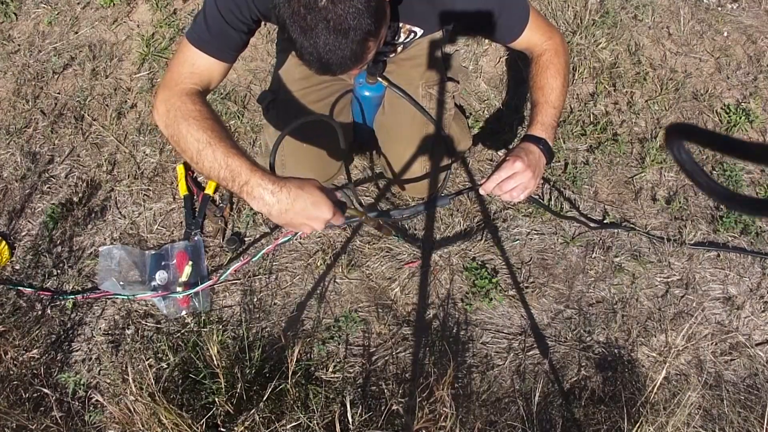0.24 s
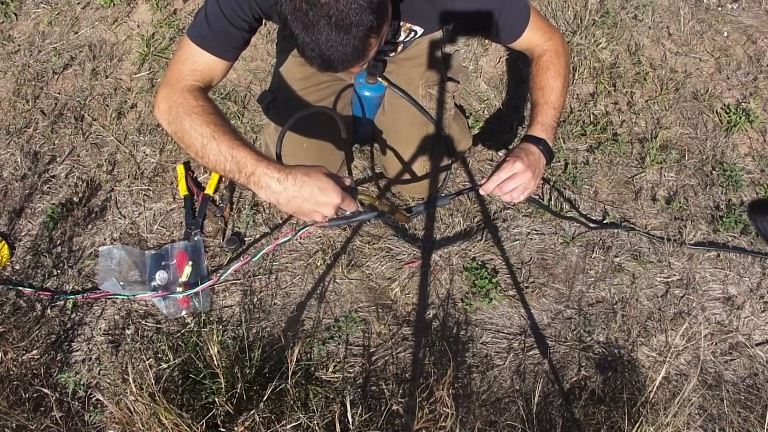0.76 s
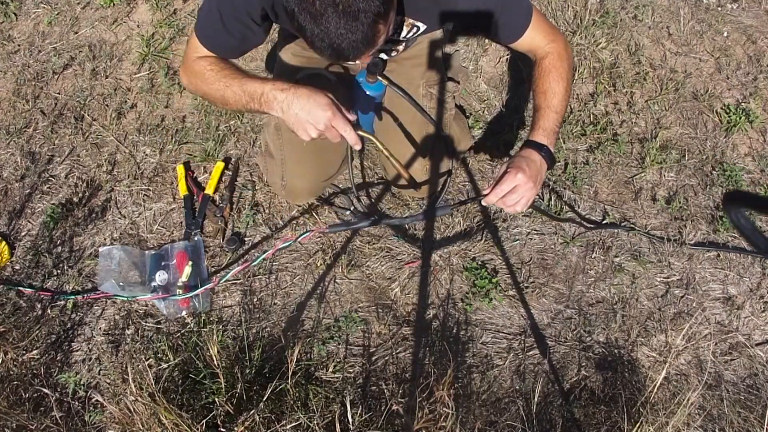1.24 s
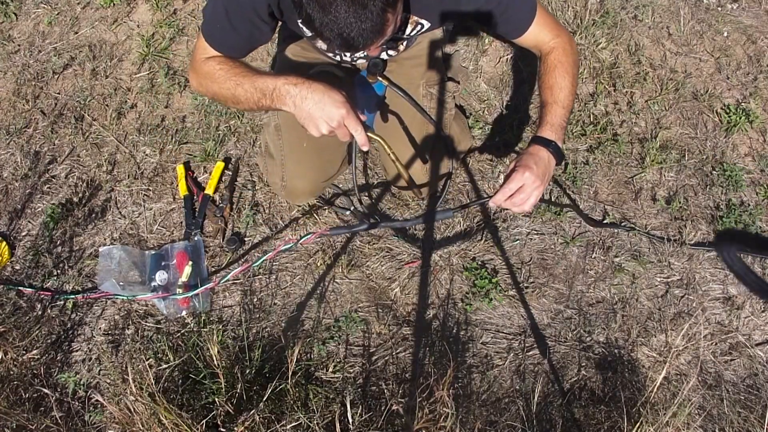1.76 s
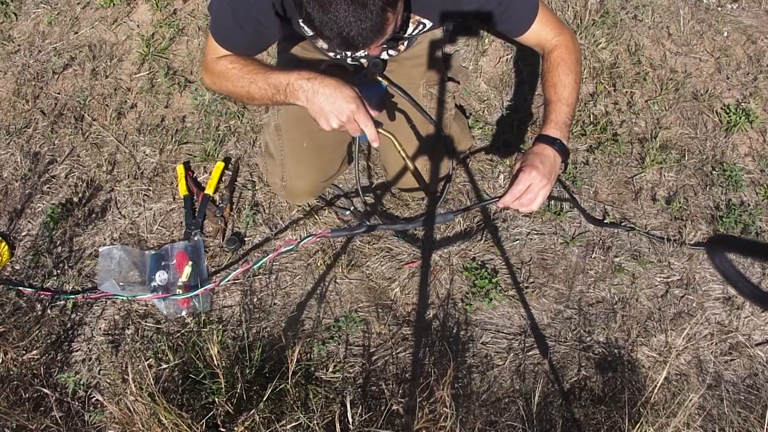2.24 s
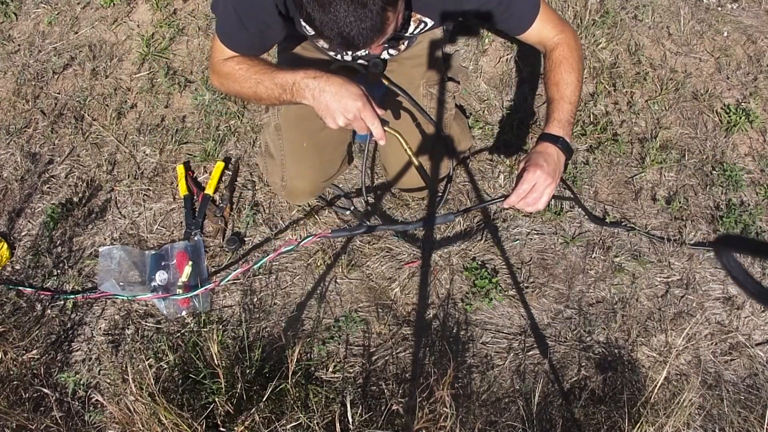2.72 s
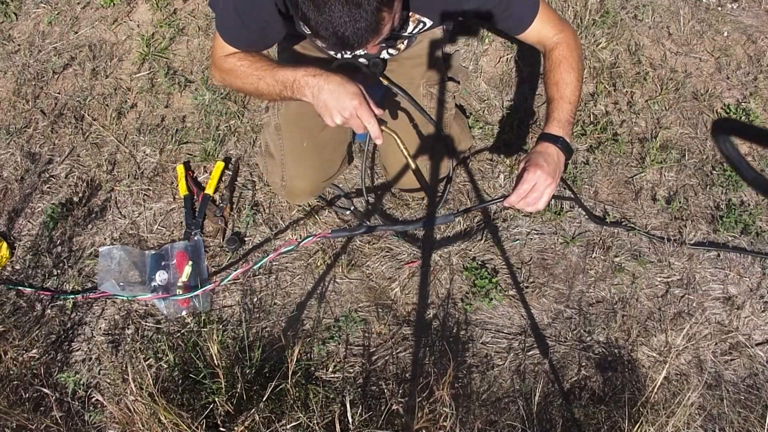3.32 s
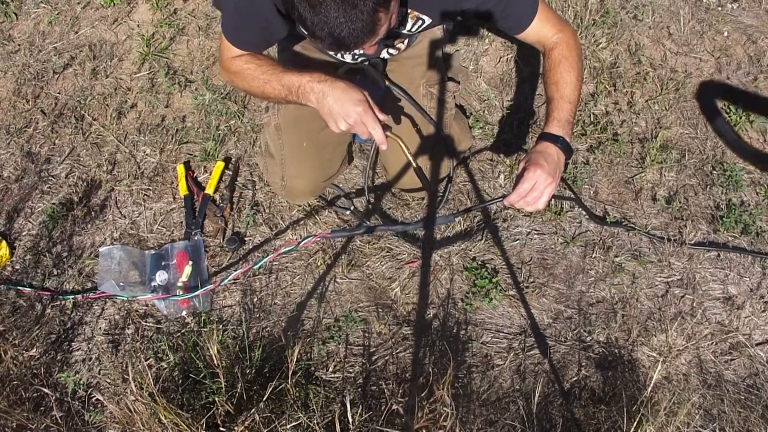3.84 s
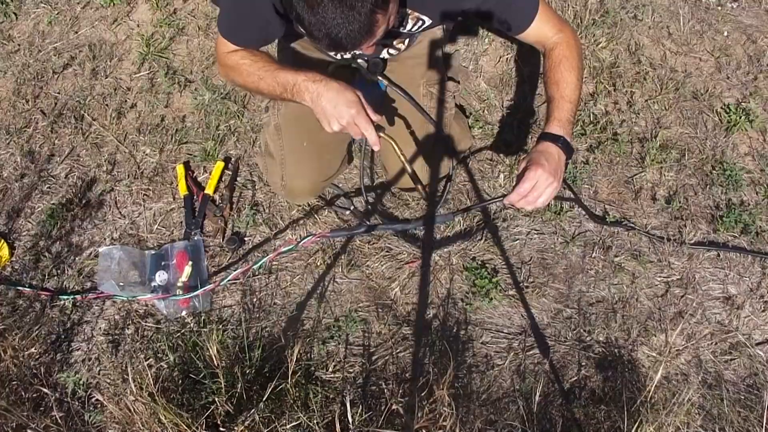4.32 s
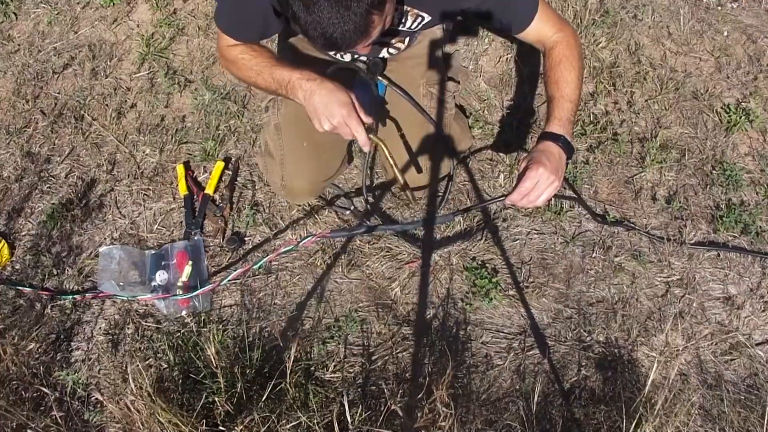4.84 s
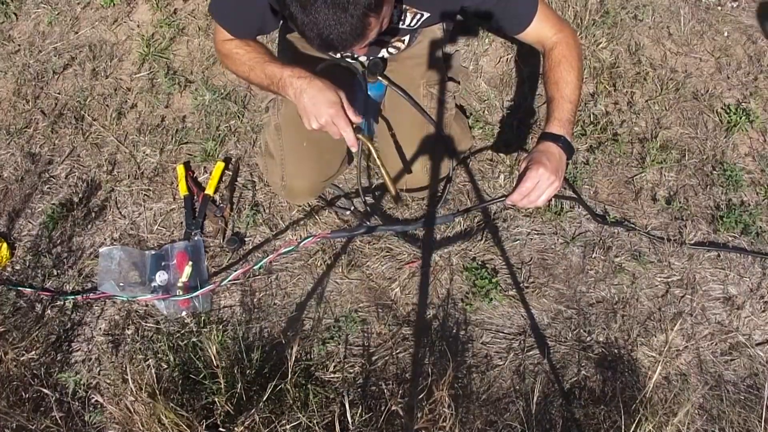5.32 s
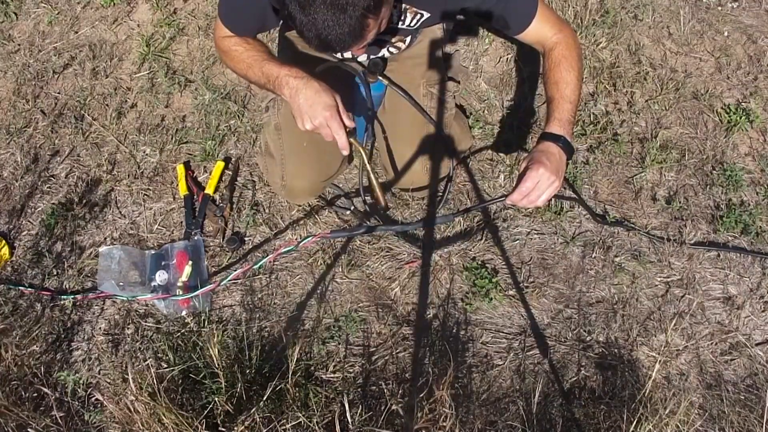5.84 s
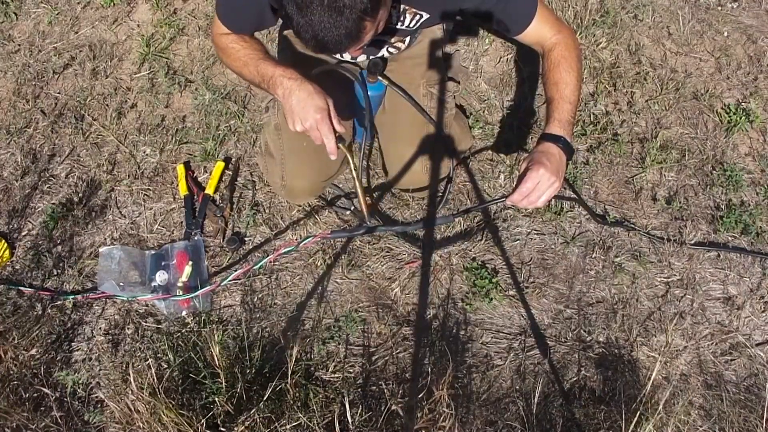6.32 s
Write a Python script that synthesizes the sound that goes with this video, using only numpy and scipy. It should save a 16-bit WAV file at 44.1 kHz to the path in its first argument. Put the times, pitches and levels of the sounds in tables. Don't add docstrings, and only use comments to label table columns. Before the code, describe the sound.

From 0 s a handheld gas torch is already burning close to dry, grassy ground: a continuous, breathy, mid-pitched roar with rapid flutter and a weaker high hiss from the nozzle. Its colour sweeps gently, a hollow phasing caused by ground echoes as the hand sways. Small flares and faint pops appear around 1.6 and 2.6 s. Light low wind puffs brush the microphone near the start and at 2.3-2.9 s, with very faint, high cricket trills far behind. Wind swells from about 3.4 s, and just after 4 s a violent gust strikes, with blunt thumps jumping between left and right. Until 6.6 s irregular low slaps and rumble keep buffeting the microphone, strongest around 4.1, 4.5, 5.0-5.2, 5.8 and 6 s, some with dull overload ticks. The loudness ducks briefly after big hits, while the torch roars on beneath, without stopping.

```python
import sys
import numpy as np
from scipy import signal
from scipy.fft import rfft, irfft, next_fast_len
from scipy.io import wavfile
from scipy.ndimage import uniform_filter1d, map_coordinates

SR = 44100
rng = np.random.default_rng(int(sys.argv[2]) if len(sys.argv) > 2 else 0)


def linear_from_db(decibels):
    return 10 ** (np.asarray(decibels, float) / 20)


def file_out(sig):
    cols = np.atleast_2d(sig).T
    lim = np.clip(cols, -1, 1)
    pcm = np.round(lim * 32767).astype(np.int16)
    wavfile.write(sys.argv[1], SR, pcm)


N = 290178

# time_s, roar_db, hiss_above_roar_db
TORCH_LEVELS = [(0, -29, -18.5), (.9, -29, -19), (1.35, -27.8, -18), (2.05, -30.5, -16.5),
                (2.9, -29, -17.5), (3.55, -29, -16.5), (4.0, -30.5, -17.5), (4.36, -37.5, -16.5),
                (4.75, -30, -18), (5.1, -30, -17.5), (5.3, -32, -19), (5.55, -29, -18),
                (5.95, -28.5, -16.5), (6.2, -33.5, -18.5), (6.36, -31, -19.5), (6.46, -28, -22.5),
                (6.58, -27, -17)]
# time_s, change_db
FLARES = [(.76, 1), (1.64, 1), (2.63, 2.5), (2.88, 1), (3.25, 2.5), (4.09, 5.5), (4.53, 4), (4.72, 2),
          (4.9, 1.5), (5.51, 0.5), (5.88, -1), (6.24, 3.5)]
# time_s, peak_db
POPS = [(1.658, -17.5), (2.629, -16.5), (4.347, -19.5), (5.341, -16), (5.406, -20.5), (5.505, -17),
        (5.867, -20.5), (6.061, -14), (6.223, -16.5), (6.404, -18.5), (6.437, -16.5), (6.482, -17)]
# pitch_hz, level_db (per Hz)
ROAR_COLOUR = [(50, -36), (200, -13.5), (330, -19), (470, -6), (700, -3.5), (1000, -1.5), (1200, -4.5),
               (1400, -2.5), (1700, -5.5), (2300, -11.5), (2800, -17), (3400, -24.5), (5000, -30)]
# pitch_hz, level_db (per Hz)
HISS_COLOUR = [(2500, -2.5), (3400, 2.5), (4500, 3.5), (5600, 3), (7200, 5), (9000, 0), (10900, 0.5),
               (13100, -31), (14500, -16), (15800, -12.5)]
# near_end_s, strokes_done
HAND_STROKES = [(-.15, -1), (.13, 0), (.72, 2), (.97, 3), (1.9, 8), (2.47, 11), (2.92, 13), (3.32, 15),
                (3.79, 17), (4.2, 19), (5.97, 28), (6.68, 32)]
# time_s, mean_delay_ms, swing_per_stroke_ms
ECHO_DELAYS = [(0, 1.388, 0.13), (.7, 1.485, 0.081), (1.1, 1.6, 0.043), (1.5, 1.63, 0.036),
               (2.05, 1.53, .05), (2.5, 1.6, 0.043), (3.2, 1.56, 0.07), (3.7, 1.54, 0.11),
               (4.2, 1.45, 0.083), (4.8, 1.3, 0.086), (5.5, 1.324, 0.069), (6.0, 1.254, 0.048),
               (6.58, 1.22, .04)]
# time_s, first_bounce (0 to 1), second_bounce (0 to 1)
ECHO_STRENGTHS = [(0, .55, 0.25), (.5, 0.5, .3), (1, 0.57, 0.18), (1.4, 0.77, 0.49), (1.7, .45, 0.23),
                  (2.05, 0.2, 0.2), (2.4, 0.43, 0.45), (3, .5, 0.31), (3.6, 0.38, 0.36), (4, 0.26, 0.04),
                  (4.5, .45, 0.08), (5, 0.52, 0.05), (5.6, 0.38, 0.03), (6, 0.5, 0), (6.58, 0.56, 0.02)]
# pitch_hz, side_below_mid_db
TORCH_SPREAD = [(100, -11), (700, -27.5), (2400, -17), (4400, -14.5), (6500, -22.5), (7800, -9),
                (9000, -11), (11000, -12.5), (15000, -3)]
# time_s, level_db, left_minus_right_db
BREEZE = [(0, -37, -7), (.2, -45.5, 3), (.42, -44, -3), (.9, -55, 4), (1.7, -69, 3), (2.3, -59, 8),
          (2.55, -54, 12), (2.7, -39.5, -5), (2.95, -57, 8), (3.2, -48, -1), (3.45, -37, 9),
          (3.65, -36.5, 3), (3.74, -29, -1), (3.96, -33, 0), (4.04, -24, -2), (4.9, -28, 5),
          (5.55, -27, 0.5), (6.58, -28.5, -1.5)]
# pitch_hz, level_db (per Hz)
RUMBLE_COLOUR = [(12, -73), (20, -48), (75, -10), (123, -1), (211, 1), (327, -2), (480, -6.5), (826, -16.5),
                 (1300, -36), (1690, -42), (2860, -120)]
# time_s, peak_db,
# pitch_hz, push (+) or pull (-)
MORE_PUFFS = [
    [(.36, -22, 120, 1), (2.28, -31, 90, 0.85), (2.88, -23, 60, -1), (3.73, -12, 222, 1), (4.08, 0, 520, -1), (4.092, -8, 850, 1), (4.068, -10, 750, -1)],
    [(.12, -27, 120, -0.85), (.46, -23, 140, 1), (2.72, -24, 150, -1.1), (2.87, -25, 90, 1), (4.06, -15, 420, 0.92)],
]
# time_s, peak_db, pitch_hz, push (+) or pull (-)
LEFT_SLAPS = [(4.0198, -10, 288, -1.1), (4.098, -8, 384, 0.69), (4.1423, -9.5, 226, -0.63),
              (4.166, -10.5, 172, 0.93), (4.2508, -1.5, 183, 0.42), (4.2972, -9.5, 215, -1.2),
              (4.3264, -12, 213, -0.89), (4.3515, -9.5, 183, 1), (4.4755, -16, 193, -1),
              (4.6447, -9.5, 170, -1.6), (4.7276, -21, 215, 1), (4.7562, -4, 340, 1),
              (4.99, -12, 193, 0.78), (5.1305, -2.5, 312, -0.96), (5.1582, -4.5, 236, -0.79),
              (5.243, -16, 241, -1.6), (5.3235, -10, 223, -1.2), (5.3658, -7, 215, -1.2),
              (5.687, -6, 161, 0.72), (5.7732, -8, 204, -1), (5.8288, -2, 326, 1),
              (5.9417, -2.5, 404, 0.64), (6.0042, -5.5, 274, 1), (6.093, -8.5, 170, 0.51),
              (6.3642, -16, 226, 1), (6.5558, -6, 312, -0.62)]
# time_s, peak_db, pitch_hz, push (+) or pull (-)
RIGHT_SLAPS = [(4.047, -7, 322, 1), (4.0702, 1, 513, -0.94), (4.0872, -0.5, 330, -0.71),
               (4.1113, -18, 258, 0.88), (4.1987, -4, 338, 0.92), (4.3696, -13, 462, -1),
               (4.5141, -1.5, 345, 1), (4.558, -8.5, 396, -1.7), (4.717, -10, 266, -0.76),
               (4.7473, -3, 440, -1.6), (4.8792, -14, 215, -1), (4.9023, -10, 204, -0.9),
               (4.9594, -7.5, 260, -0.64), (5.0432, 0, 318, 0.86), (5.1146, -6, 193, 1),
               (5.15, -11, 290, -1), (5.1941, -3, 307, 1), (5.2178, -3.5, 249, 0.92),
               (5.4144, -10, 448, -1.5), (5.775, -7, 236, 0.78), (5.8145, 0, 455, -0.73),
               (5.9726, -2.5, 366, -0.46), (6.077, -9, 333, -0.98), (6.1727, -8.5, 301, -0.69),
               (6.1974, -5.5, 312, -0.91), (6.2669, -8, 293, -1.7), (6.3194, -5, 269, 1),
               (6.3588, -10, 236, -1.2), (6.5549, -2, 298, -0.56)]
# start_pitch_hz, rise_hz, trill_length_s, level_db
CRICKETS = [
    (7100, 100, 0.81, -61),
    (7950, 150, .3, -66),
    (8600, 170, 0.33, -66),
]
TRILL_STARTS = [
    [.35, 1.05, 1.7, 2.35, 3.05, 4.7, 5.4, 6.12],
    [.42, 1.12, 1.75, 2.42, 3.12, 3.68, 4.5, 5.15, 5.85],
    [.1, .9, 1.82, 2.65, 3.25, 3.6, 3.97, 4.85, 5.57, 6.4],
]
# pitch_hz, width_hz, change_db
BAND_CUTS = [
    (3002, 1200, -43),
    (3990, 1390, -36),
    (4940, 1040, -42),
    (12080, 3850, -30),
    (12700, 3100, -22),
]
# time_s, top_db, half_of_left_minus_right_db, lower_db
CRACKS = [(4.0701, -50, -14, -54), (4.1385, -53, 10, -52), (4.2487, -54, 11, -58), (4.2946, -53, 10.0, -59),
          (4.5126, -55, -10, -37), (4.7466, -46, -15, -41), (5.042, -55, -16, -38), (5.1287, -51, 13, -44),
          (5.215, -57, -10, -50), (5.9444, -68, 7, -42), (5.9704, -73, 5, -55), (6.0881, -65, 7, -49),
          (6.319, -64, -9, -57)]


def in_time(rows):
    s, *columns = np.transpose(rows)
    return [np.interp(np.arange(N) / SR, s, column) for column in columns]


def rms_one(x):
    return x / np.sqrt(np.mean(x ** 2) + 1e-20)


def at_hz(points, hz):
    point_hz, point_db = np.transpose(points)[:2]
    return np.interp(np.log(hz + 1), np.log(point_hz), point_db)


def filtered(x, order, hz, kind="low"):
    return signal.sosfiltfilt(signal.butter(order, hz, kind, fs=SR, output="sos"), x)


def drift(rate_hz):
    r = np.exp(-2 * np.pi * rate_hz * 20 / SR)
    noise = rng.standard_normal(N // 20 + 2002)
    slow = signal.lfilter([1], [1, -2 * r, r * r], noise)[2000:]
    return np.interp(np.arange(N) / 20, np.arange(len(slow)), rms_one(slow))


def bumps(s, heights, width_s):
    t = np.arange(0, N + 50, 50) / SR
    coarse = np.exp(-((t[:, None] - s) / width_s) ** 2) @ heights
    return np.interp(np.arange(N) / SR, t, coarse)


def turbulence(colour, shared_db, own_db, own_rate, octaves):
    size = next_fast_len(N)
    hz = np.arange(size // 2 + 1) * SR / size
    coloured = rfft(rng.standard_normal(size)) * linear_from_db(at_hz(colour, hz))
    place = np.log2(hz + 1) / octaves
    lowest = int(np.log2(colour[1][0]) / octaves) - 1
    highest = int(np.log2(colour[-1][0]) / octaves)
    out = np.zeros(N)
    for centre in range(lowest, highest + 1):
        share = np.clip(1 - abs(place - centre), 0, 1) ** .5
        band = irfft(coloured * share, size)[:N]
        out += band * linear_from_db(own_db * drift(own_rate))
    return rms_one(out * linear_from_db(shared_db))


def delayed(x, ms):
    return map_coordinates(x, [np.arange(N) - ms * SR / 1000], order=3)


def echo_delay_ms():
    mean_ms, swing_ms = in_time(ECHO_DELAYS)
    strokes, = in_time(HAND_STROKES)
    return mean_ms - swing_ms * np.cos(2 * np.pi * strokes)


def ground_echo(roar, count, cycles):
    mean_ms, middle_hz = 1.444, 1510
    late = signal.hilbert(delayed(roar, count * mean_ms), next_fast_len(N))[:N]
    turn = count * middle_hz * (echo_delay_ms() - mean_ms) / 1000 + cycles
    return np.real(late * np.exp(-2j * np.pi * turn))


def resonance(x, hz, width_hz):
    r = np.exp(-np.pi * width_hz / SR)
    ring = [1, -2 * r * np.cos(2 * np.pi * hz / SR), r * r]
    return signal.lfilter(np.array([1, 0, -1]) * (1 - r * r) / 2, ring, x)


def torch_levels():
    steady_db, hiss_over_db = in_time(TORCH_LEVELS)
    flare_db = bumps(*np.transpose(FLARES), width_s=0.04)
    pop_s, pop_peak_db = np.transpose(POPS)
    pop_db = bumps(pop_s, np.maximum(pop_peak_db + 21, 0), width_s=.007)
    roar_db = steady_db + flare_db + pop_db
    hiss_db = steady_db + hiss_over_db + 0.91 * flare_db + .3 * pop_db
    return roar_db, hiss_db


def flame_roar(flutter_db):
    roar = turbulence(ROAR_COLOUR, flutter_db, own_db=2.37, own_rate=67, octaves=.5)
    first, second = np.clip(in_time(ECHO_STRENGTHS), 0, .9)
    roar = roar + 2.8 * np.maximum(second - .12, 0) * resonance(roar, hz=1195, width_hz=120)
    upper = filtered(roar, 2, 750, "high")
    echoes = first * ground_echo(upper, count=1, cycles=-0.047)
    echoes += second * ground_echo(upper, count=2, cycles=0.13)
    echoes += 0.51 * second * ground_echo(upper, count=3, cycles=0.4)
    return (roar + echoes) / np.sqrt(1 + first ** 2 + second ** 2)


def nozzle_hiss(flutter_db):
    returned = 0.38
    shared_db = 0.33 * flutter_db + 0.69 * drift(110)
    hiss = turbulence(HISS_COLOUR, shared_db, own_db=2.0, own_rate=28, octaves=0.48)
    return (hiss + returned * delayed(hiss, echo_delay_ms())) / np.sqrt(1 + returned ** 2)


def torch():
    roar_db, hiss_db = torch_levels()
    flutter_db = 1.34 * drift(71)
    mid = linear_from_db(roar_db + 1.5) * flame_roar(flutter_db)
    mid += linear_from_db(hiss_db + 4.0) * nozzle_hiss(flutter_db)
    size = next_fast_len(N)
    scattered = rfft(np.roll(mid, 900), size)
    hz = np.linspace(0, SR / 2, len(scattered))
    side = irfft(scattered * linear_from_db(at_hz(TORCH_SPREAD, hz)))[:N]
    return np.array([mid + side, mid - side]) * linear_from_db(np.array([[-.3], [.3]]))


def port_levels(tables):
    breeze_db, pan_db = in_time(BREEZE)
    for side, table in zip((.5, -.5), tables):
        s, peak_db = np.transpose(table)[:2]
        wake = bumps(s, linear_from_db(peak_db - 17) ** 2, width_s=0.027)
        yield 10 * np.log10(linear_from_db(breeze_db + side * pan_db) ** 2 + wake)


def wind_rumble(level_db):
    rumble = turbulence(RUMBLE_COLOUR, 2.9 * drift(24.7), own_db=3.0, own_rate=23.0, octaves=.7)
    deep = filtered(rumble, 2, 110)
    rumble = rumble - deep + deep * linear_from_db(-.3 * (level_db + 33.5))
    bright = filtered(rumble, 2, 300, "high")
    rumble = rumble - bright + bright * linear_from_db(np.minimum(0.42 * (level_db + 19.0), 4.0))
    return linear_from_db(level_db + 2.0) * rumble


def wind_slaps(table):
    out = np.zeros(N + 1600)
    t = np.arange(-800, 800) / SR
    for s, db, hz, sign in table:
        cycles = t * (0.75 * hz + 80)
        shape = np.where(t < 0, np.exp(-(cycles / 0.63) ** 2), np.exp(-abs(cycles) / 0.66))
        at = round(s * SR)
        out[at:at + 1600] += sign * linear_from_db(db + 2.0) * shape * np.cos(2 * np.pi * cycles)
    return filtered(out[800:N + 800] + 1e-18, 1, 115, "high")


def wind():
    tables = [list(LEFT_SLAPS) + list(MORE_PUFFS[0]), list(RIGHT_SLAPS) + list(MORE_PUFFS[1])]
    left, right = [wind_rumble(level_db) + wind_slaps(table)
                   for level_db, table in zip(port_levels(tables), tables)]
    crossfeed = .31
    return np.array([left - crossfeed * right, right - crossfeed * left])


def crickets():
    out = np.zeros((2, N))
    trills = [(s, *cricket) for cricket, starts in zip(CRICKETS, TRILL_STARTS) for s in starts]
    chances = rng.random((len(trills), 3))
    for (s, start_hz, rise_hz, length, db), chance in zip(trills, chances):
        at = max(round(s * SR), 0)
        t = np.arange(min(round(length * SR), N - at)) / SR
        stroke_hz = 38 + 5 * chance[0]
        strokes = np.clip(np.sin(2 * np.pi * (stroke_hz * t + chance[1])) + 0.33, 0, 1)
        swell = np.clip(t / length, 0, 1) ** 0.31 * np.clip((length - t) / .03, 0, 1)
        wobble_hz = 900 * uniform_filter1d(rng.standard_normal(N), 200)[:len(t)]
        phase = 2 * np.pi * np.cumsum(start_hz + rise_hz * t / length + wobble_hz) / SR
        tone = np.sin(phase + np.array([[0], [2.4]]))
        out[:, at:at + len(t)] += linear_from_db(db + 10.5) * strokes * swell * tone
    return out


def scene():
    return torch() + wind() + crickets()


def equaliser(x):
    for hz, width_hz, db in BAND_CUTS:
        w, depth = 2 * np.pi * hz / SR, linear_from_db(db)
        a = np.tan(np.pi * min(width_hz, 9000) / SR)
        top = [1 + a * depth, -2 * np.cos(w), 1 - a * depth]
        x = signal.lfilter(top, [1 + a, -2 * np.cos(w), 1 - a], x)
    return x


def limiter(x, knee_db=-10.0, share=.7, release_db_per_s=280.):
    peak_db = 20 * np.log10(np.abs(x).max(axis=0) + 1e-9)
    over_db = share * np.maximum(peak_db - knee_db, 0)
    ramp = release_db_per_s * np.arange(N) / SR
    held_db = np.maximum.accumulate(over_db + ramp) - ramp
    return x * linear_from_db(-signal.lfilter([.02], [1, -.98], held_db))


def cracks():
    out = np.zeros((2, N))
    k = np.arange(40)
    dull = k * np.exp(-k / 3.1) / 4.9
    for s, top_db, pan_db, low_db in CRACKS:
        at = round((s + 0.00114) * SR)
        sides = linear_from_db(np.clip([pan_db, -pan_db], -15, 0) * 2)
        out[:, at] += linear_from_db(top_db + 26.5) * sides
        out[:, at:at + 40] += linear_from_db(low_db + 34.0) * sides[:, None] * dull
    return signal.sosfilt(signal.butter(2, 1500, "high", fs=SR, output="sos"), out)


def roll_off(x):
    return signal.sosfilt(signal.butter(12, 15830, fs=SR, output="sos"), x)


def record(dry):
    x = signal.sosfilt(signal.butter(3, 47.6, "high", fs=SR, output="sos"), dry)
    mix = limiter(equaliser(x)) + cracks()
    return roll_off(mix)


dry = scene()
out = record(dry)
file_out(out)
```